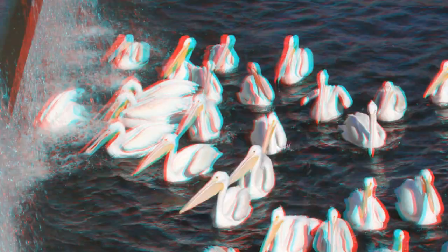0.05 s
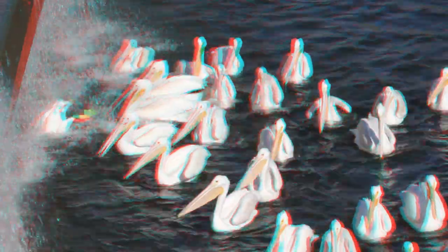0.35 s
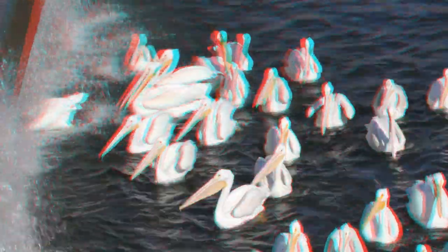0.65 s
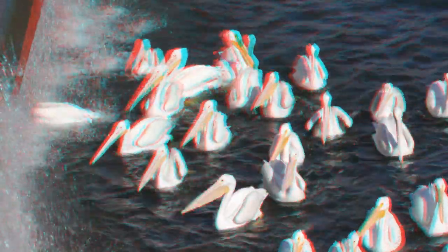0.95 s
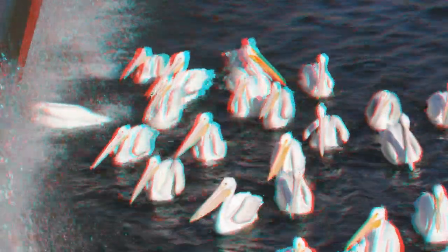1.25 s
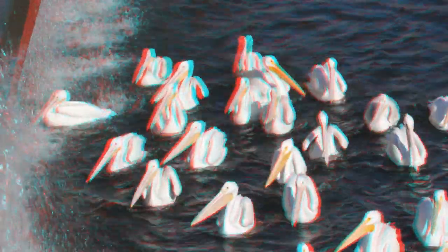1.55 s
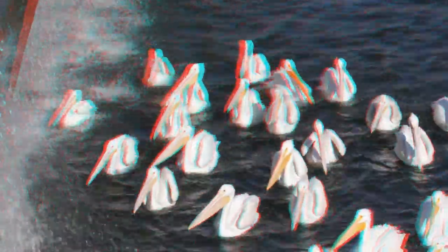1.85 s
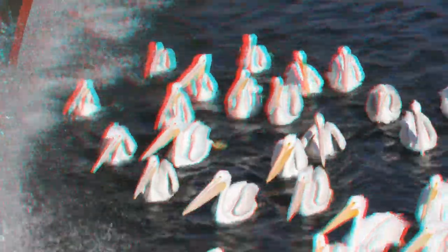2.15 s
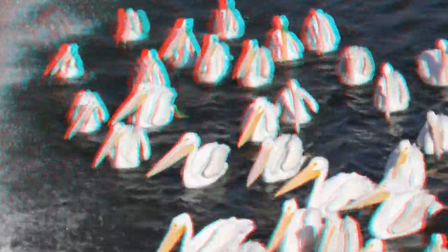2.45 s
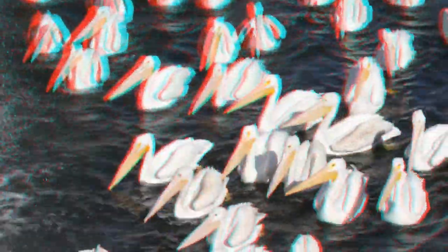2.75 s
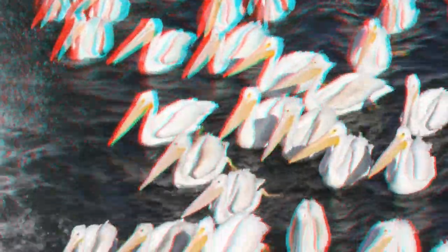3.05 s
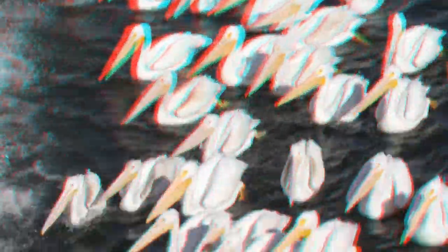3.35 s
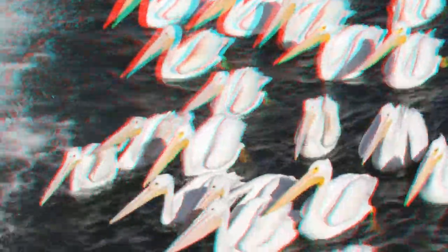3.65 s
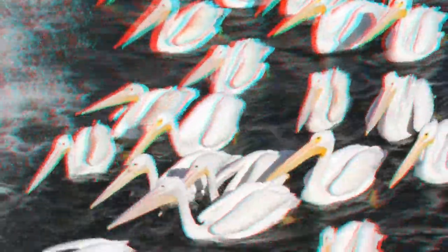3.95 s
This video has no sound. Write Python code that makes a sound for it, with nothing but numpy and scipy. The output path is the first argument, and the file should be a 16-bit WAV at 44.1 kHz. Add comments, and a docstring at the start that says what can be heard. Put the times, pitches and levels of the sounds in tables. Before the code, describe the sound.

Water pours over a low dam some way off, making a dense, steady roar for the whole four seconds. Spray hisses on top and nearer drops and bubbles spatter finely, the rush swelling and sagging only slightly. A light outdoor breeze rumbles faintly on the microphone, with soft low bumps at about 1.9 and 2.6 seconds and a small cluster near 3.1 seconds.

```python
"""A steady roar of water pouring over a low dam, outdoors, some way off, in mono.
Countless bubbles under the plunging sheet merge into the roar; the spray above it hisses.
Nearer drops and bursting bubbles ring as spatter. The whole rush swells and sags a little.
A light breeze rumbles on the microphone, and now and then an eddy bumps it."""
import sys
import numpy as np
from scipy import signal
from scipy.fft import rfft, irfft
from scipy.io import wavfile
from scipy.ndimage import uniform_filter1d

SR = 44100
rng = np.random.default_rng(int(sys.argv[2]) if len(sys.argv) > 2 else 0)


def wrap_up_sound(samples):
    """Save the sound to the file named by the first command line argument, as 16-bit audio."""
    columns = np.atleast_2d(samples).T
    # keep every value between -1 and 1, then stretch to whole-number steps
    tamed = np.clip(columns, -1, 1)
    steps = np.round(tamed * 32767).astype(np.int16)
    wavfile.write(sys.argv[1], SR, steps)


N = 176400
TIME_S = np.arange(N) / SR

# breeze spectrum (frequency [Hz], relative density [dB])
BREEZE_SPECTRUM = [(8, -32), (22, -16), (45, -1.5), (85, -1.5), (130, 1.5), (220, -19), (500, -40),
                   (2000, -90)]
# breeze envelope (time [s], relative level [dB])
BREEZE_ENVELOPE = [(0.03, -35), (0.08, -40), (0.5, -37), (0.85, -46), (1.7, -46), (1.85, -40), (2.0, -43),
                   (2.38, -35), (2.55, -41), (3.0, -43), (3.13, -36), (3.25, -44.5), (3.7, -51),
                   (3.98, -41)]
# eddies on the microphone (time [s], peak [dB], pitch [Hz])
EDDIES = [(0.039, -25, 110), (1.86, -16.5, 170), (2.352, -19, 140), (2.628, -11.5, 130), (3.086, -20, 140),
          (3.118, -18, 110), (3.142, -22, 110), (3.17, -16, 145), (3.932, -22, 130)]
# water spectrum (frequency [Hz], relative density [dB])
RUSH_SPECTRUM = [(110, -4.5), (190, -0.5), (240, -2.5), (290, -0.5), (385, -3.7), (500, -2.0), (630, -1.6),
                 (780, -2.6), (900, -2.5), (1300, -2.5), (2100, -4), (3300, -3.5), (3800, -4.5),
                 (5100, -4.0), (6200, -7), (7600, -7), (9200, -9), (10400, -7.3), (12300, -8.5),
                 (14000, -13), (15600, -21)]
# roar envelope (time [s], relative level [dB])
ROAR_ENVELOPE = [(0.03, -18.5), (0.31, -18), (0.43, -20), (0.51, -18.5), (1.09, -20.5), (1.13, -19.5),
                 (1.83, -18.5), (1.87, -18.5), (1.99, -17.5), (2.17, -18.5), (2.27, -18.5), (2.33, -20.0),
                 (2.59, -19.5), (2.73, -20.6), (2.77, -17.5), (2.81, -20.1), (3.37, -19.5), (3.81, -20.0),
                 (3.85, -19), (3.97, -19.6)]
# hiss envelope (time [s], relative level [dB])
HISS_ENVELOPE = [(0.03, -21), (0.33, -20.5), (0.45, -22), (0.55, -19), (0.79, -22), (0.95, -20.5),
                 (1.05, -24.5), (1.13, -21), (2.31, -20), (2.39, -22.5), (2.59, -20.5), (2.67, -23),
                 (2.75, -21), (3.29, -21.5), (3.37, -20), (3.79, -21.5), (3.85, -20), (3.97, -20.5)]


def gain_of(db):
    """Decibels to amplitude gain."""
    return 10 ** (np.asarray(db) / 20)


def unit_rms(x):
    """Scales to rms 1."""
    return x / np.sqrt(np.mean(x ** 2) + 1e-20)


def swing_db(envelope, time_s):
    """An envelope about its own mean."""
    db = np.interp(time_s, *np.transpose(envelope))
    return db - db.mean()


def coloured(x, spectrum):
    """Filters x by a spectrum interpolated in log frequency."""
    hz, db = np.transpose(spectrum)
    bin_hz = np.fft.rfftfreq(N, 1 / SR)
    bin_db = np.interp(np.log(bin_hz + 1), np.log(hz + 1), db)
    return irfft(rfft(x) * gain_of(bin_db), N)


def patches(shape, steps, bins):
    """Random field, rms 1, smoothed over time steps and frequency bins."""
    field = uniform_filter1d(rng.standard_normal(shape), steps, axis=0)
    return unit_rms(uniform_filter1d(field, bins, axis=1))


def breeze(rms_db=-41, lumpy_db=3.5):
    """Air passing the microphone: a low, lumpy rumble."""
    lumps_db = lumpy_db * patches((N, 1), steps=1500, bins=1)[:, 0]
    air = coloured(rng.standard_normal(N), BREEZE_SPECTRUM)
    level_db = swing_db(BREEZE_ENVELOPE, TIME_S) + lumps_db
    return gain_of(rms_db) * unit_rms(air * gain_of(level_db))


def eddy(at_s, peak_db, pitch_hz):
    """One soft push of pressure with a dip on each side."""
    offset_squared = (np.pi * pitch_hz * (TIME_S - at_s)) ** 2
    return gain_of(peak_db) * (1 - 2 * offset_squared) * np.exp(-offset_squared)


def spatter(rms_db=-30, spread_db=4, rate_per_s=2500, decay_cycles=2.4, pitches=30):
    """Nearer drops and bursting bubbles: tiny damped rings, a few of them large."""
    drops = np.zeros(N)
    ring_s = np.arange(1024) / SR
    for hz in np.geomspace(600, 12000, pitches):
        strength = gain_of(spread_db * np.minimum(rng.exponential(1, N), 5))
        hits = strength * (rng.random(N) < rate_per_s / pitches / SR)
        age = ring_s * hz / decay_cycles
        ring = np.sqrt(age) * np.exp(-age) * np.sin(2 * np.pi * hz * ring_s)
        drops += signal.oaconvolve(hits, unit_rms(ring))[:N]
    return gain_of(rms_db) * unit_rms(drops)


def rush(rms_db=-17, patchy_db=0.37, flicker_db=0.43, hiss_from_hz=4400, low_cut_hz=105):
    """Bubbles merge into a roar, spray hisses on top; clumps of falling water make it patchy."""
    framing = dict(nperseg=512, noverlap=384)
    bin_hz, frame_s, noise = signal.stft(rng.standard_normal(N), SR, **framing)
    hiss_share = 1 / (1 + (hiss_from_hz / (bin_hz + 1)) ** 4)
    roar_db = swing_db(ROAR_ENVELOPE, frame_s)[:, None]
    hiss_db = swing_db(HISS_ENVELOPE, frame_s)[:, None]
    level_db = (1 - hiss_share) * roar_db + hiss_share * hiss_db
    level_db += patchy_db * patches(level_db.shape, steps=24, bins=9)
    level_db += flicker_db * patches(level_db.shape, steps=4, bins=90)
    water = signal.istft(noise * gain_of(level_db).T, **framing)[1][:N]
    low_cut = signal.butter(2, low_cut_hz, "high", fs=SR, output="sos")
    water = signal.sosfilt(low_cut, coloured(water, RUSH_SPECTRUM))
    return gain_of(rms_db) * unit_rms(water)


def scene():
    """Water and breeze, identical in both channels."""
    mono = rush() + spatter() + breeze() + sum(eddy(*row) for row in EDDIES)
    return np.array([mono, mono])


def record(dry):
    """Steep low-pass band limit."""
    cutoff_hz = 15850
    low_pass = signal.firwin(801, cutoff_hz, window=("kaiser", 9), fs=SR)
    return signal.oaconvolve(dry, low_pass[None], "same")


dry = scene()
out = record(dry)
wrap_up_sound(out)
```